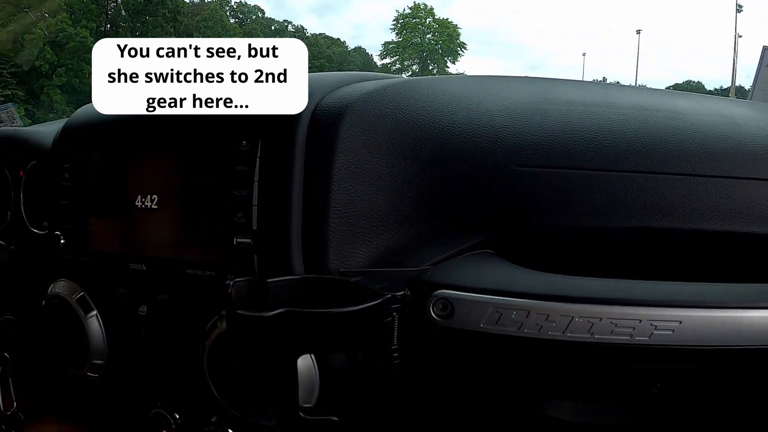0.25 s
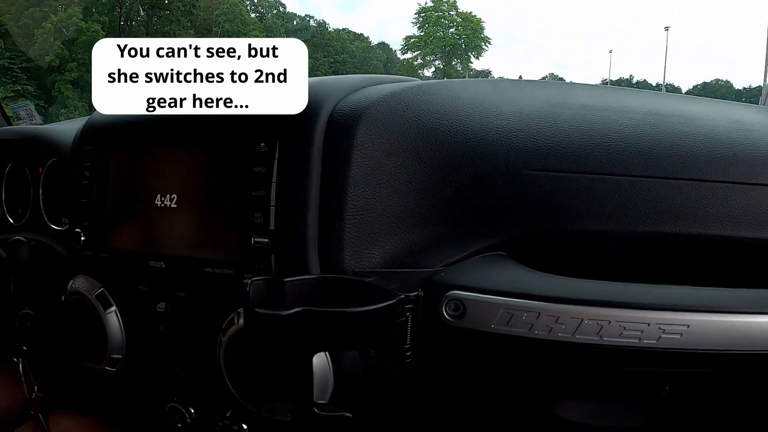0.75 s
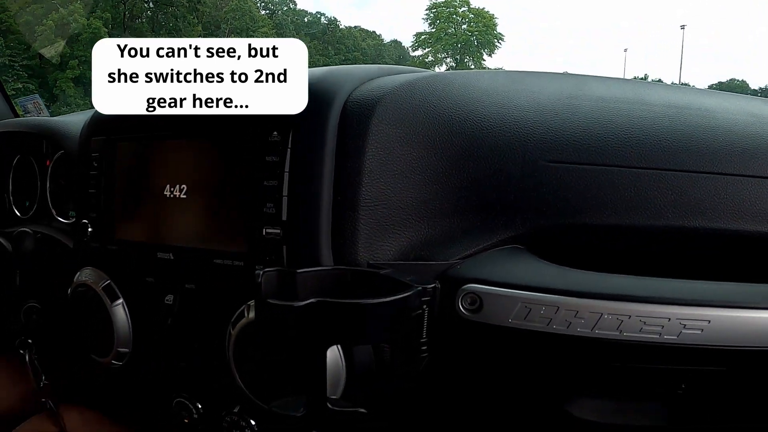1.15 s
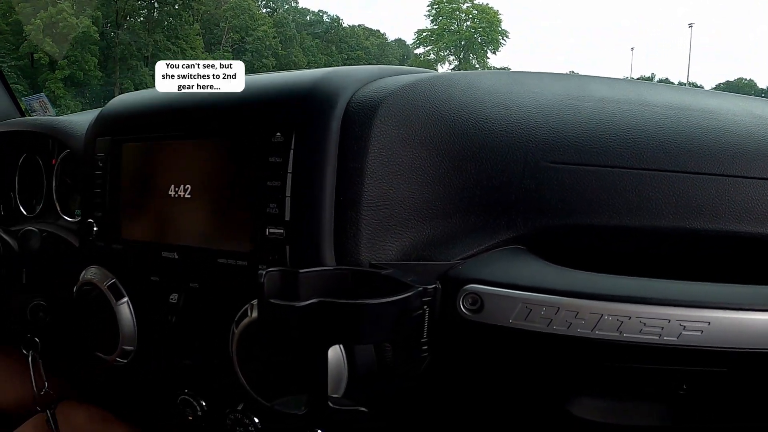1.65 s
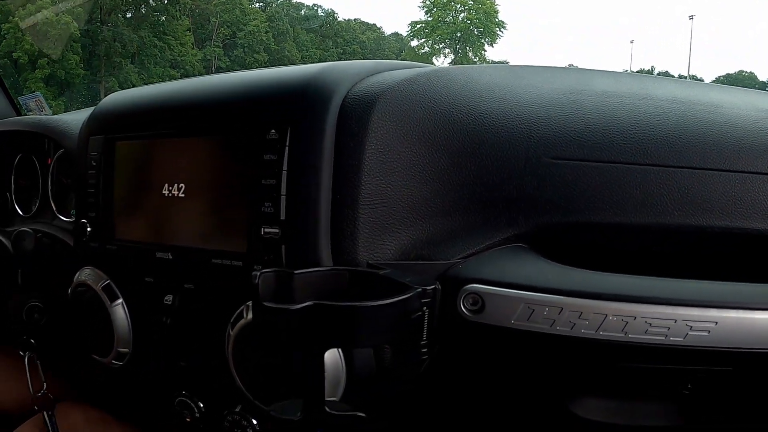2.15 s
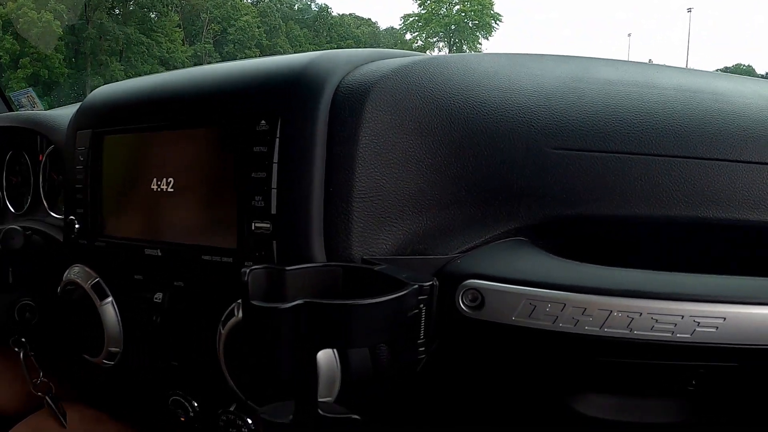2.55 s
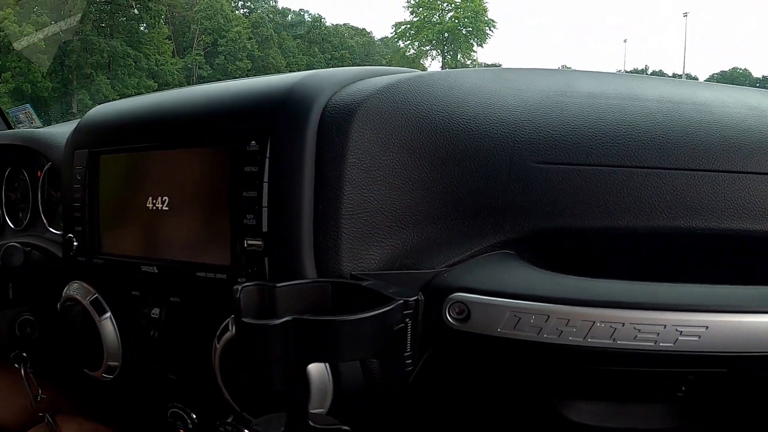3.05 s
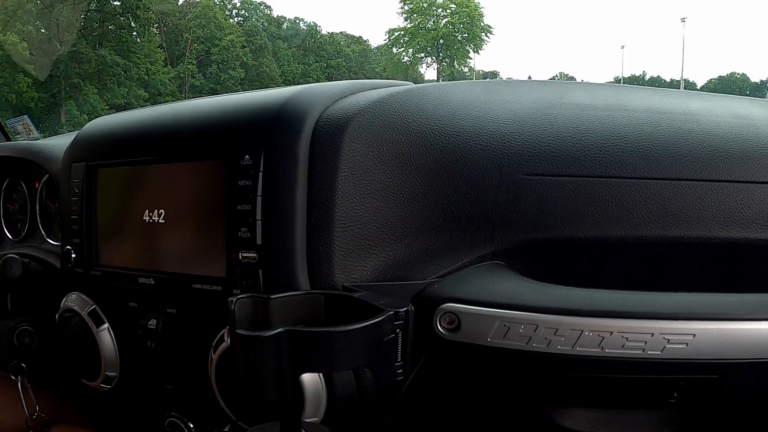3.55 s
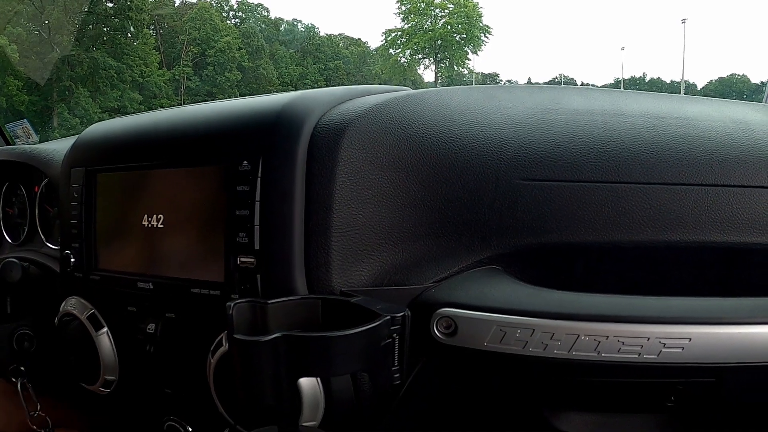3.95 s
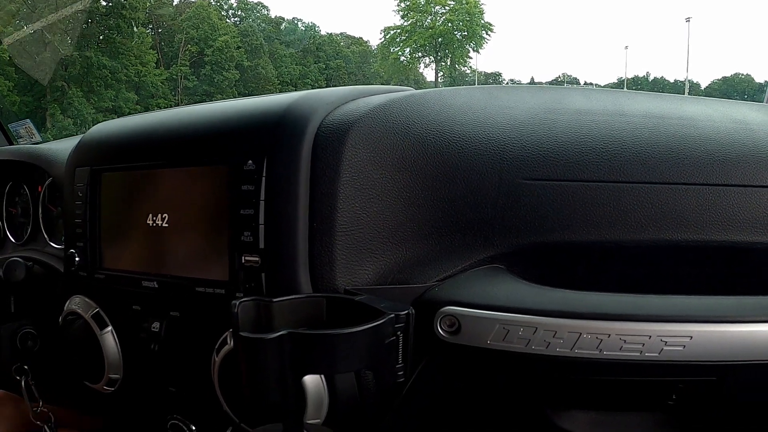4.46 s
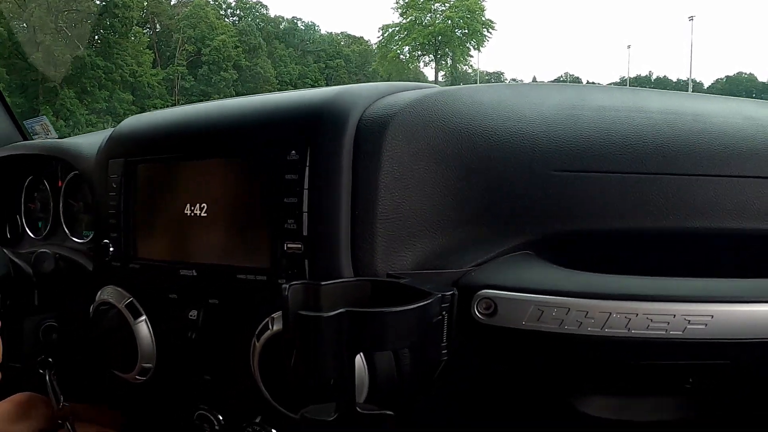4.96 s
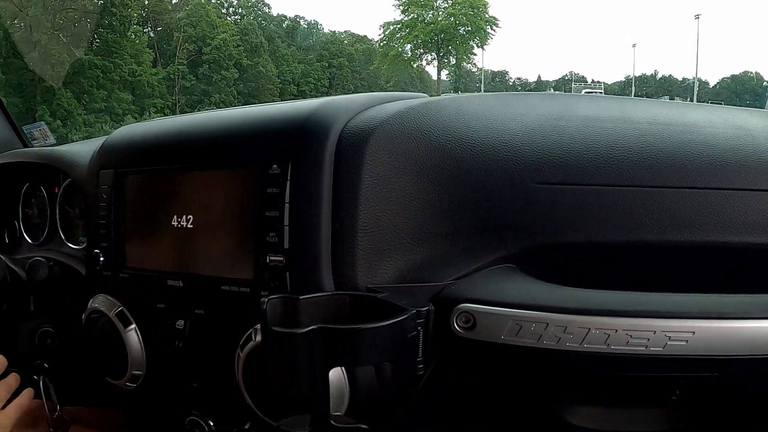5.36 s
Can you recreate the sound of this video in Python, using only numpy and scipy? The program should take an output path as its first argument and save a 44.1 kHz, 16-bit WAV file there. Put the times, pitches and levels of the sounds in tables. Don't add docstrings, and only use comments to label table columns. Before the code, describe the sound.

Inside a slow-moving car, a deep engine boom climbs, dips briefly for a gear change, then returns lower, rougher and shuddering.

```python
import sys
import numpy as np
from scipy import signal
from scipy.io import wavfile
from scipy.ndimage import uniform_filter1d

SR = 44100
rng = np.random.default_rng(int(sys.argv[2]) if len(sys.argv) > 2 else 0)


def decibels_to_gain(level_db):
    exponent = np.asarray(level_db, float) / 20
    return 10 ** exponent


def bounce(signal):
    frames = np.transpose(np.atleast_2d(signal))
    limited = np.clip(frames, -1, 1)
    pcm = np.round(limited * 32767).astype(np.int16)
    wavfile.write(sys.argv[1], SR, pcm)


N = 247071


def evened(x):
    return x / np.sqrt(np.mean(x ** 2) + 1e-20)


def read(points, hz):
    f, value = np.transpose(points)
    return np.interp(np.log(hz + 1), np.log(f + 1), value)


def columns(rows, t):
    s, *rest = np.transpose(rows)
    return [np.interp(t, s, c) for c in rest]


def swells(at, half, heights, power):
    t = np.arange(0, N + 128, 128) / SR
    shapes = np.exp(-abs((t - at[:, None]) / half[:, None]) ** power)
    return np.interp(np.arange(N) / SR, t, np.dot(heights, shapes))


def wander(rate_hz):
    t = np.arange(0, N, 256) / SR
    slow = 0
    for f in np.geomspace(rate_hz / 20, rate_hz, 16):
        slow = slow + np.sin(2 * np.pi * (f * t + rng.random())) / np.sqrt(f)
    return np.interp(np.arange(N) / SR, t, evened(slow))


def resonate(x, hz, width):
    turn = np.exp(2j * np.pi * np.cumsum(hz * np.ones(x.shape[-1])) / SR)
    r = np.exp(-np.pi * width / SR)
    low = signal.lfilter([1 - r], [1, -r], x / turn)
    low = signal.lfilter([1 - r], [1, -r], low)
    return 2 * (turn * low).real


def grit(size, own_share):
    common, left, right = rng.standard_normal((3, size))
    return common + own_share * np.array([left, right])


def puff(t, rise, t60):
    attack = np.sin(np.pi / 2 * np.minimum(t / rise, 1)) ** 2
    return attack * decibels_to_gain(-60 * np.maximum(t - rise, 0) / t60)


def add(mix, s, sound):
    part = mix[:, round(s * SR):][:, :sound.shape[1]]
    part += sound[:, :part.shape[1]]


# (time [s], half the firing rate [Hz])
ENGINE_SPEED = [(0.0, 24.65), (0.45, 25.31), (1.5, 26.5), (1.78, 26.25), (1.94, 25.8), (2.19, 24.13),
                (2.44, 24.3), (2.6, 23.4), (3.06, 20.15), (3.42, 19.3), (3.7, 18.0), (4.04, 17.2),
                (4.42, 17.01), (4.68, 15.78), (4.82, 15.95), (5.1, 16.97), (5.3, 17.53), (5.6, 17.62)]
# (time [s], level from full pull [dB])
ENGINE_LOAD = [(0.0, 2.5), (0.1, -4.5), (0.3, .6), (1.55, -.6), (1.68, -3), (1.78, -11), (1.94, -17),
               (2.21, -10), (2.3, .8), (2.6, -.3), (2.9, -2.5), (3.42, -6), (3.49, -21), (3.63, -19),
               (3.74, -12), (4.6, -8), (5.0, -6), (5.6, -11)]
# (time [s], half length [s], firing tone [dB], even multiples [dB], odd multiples [dB])
DRIVELINE_SURGES = [(1.44, 0.4, 0.1, -2.5, 4), (1.774, 0.096, -2, -2, 9), (2.075, 0.1, 7.5, -6, -3),
                    (2.418, 0.16, 1, -6, 2), (2.577, .06, 1.1, -0.3, -9), (2.763, 0.16, -1.8, -10, 3.5),
                    (2.904, 0.017, 2.5, 7.5, -4), (3.032, 0.1, -4.5, -4.5, 4), (3.135, 0.12, 1, 7.5, -5),
                    (3.27, 0.023, -3.5, -7.5, 2.7), (3.344, 0.043, 6.5, 5, -20),
                    (3.417, 0.03, -2.5, -0.5, 14), (3.593, 0.088, -6, 0.5, 10),
                    (3.708, 0.06, 4.5, 2.5, 0.5), (4.037, 0.081, 10.5, -3.2, 6),
                    (4.194, 0.064, 6, -0.5, -1), (4.37, 0.046, -1, -0.5, -4.5), (4.506, 0.044, -1, -2, 0),
                    (4.704, 0.12, -2, 3, -12), (4.827, 0.045, 7, -3, -3.5), (5.028, 0.08, 7, -6.2, -7.5),
                    (5.196, 0.13, -5.5, -7.5, 3.5), (5.418, .05, 8.5, -5, .6),
                    (5.506, 0.048, -16, 4.5, -13)]
UPPER_LEVELS = [-24, -19, -19.5, -19, -30.5, -19.5, -22.5, -23, -23.5]
# (frequency [Hz], level [dB])
CABIN_RESPONSE = [(80, -10.5), (100, -18), (110, -7), (122, -1), (139, -6.5), (150, -15.5), (157, -28.5),
                  (166, -42), (205, -45), (260, -41.5), (330, -57)]
# (frequency [Hz], level [dB])
FLOOR_PAN_RESPONSE = [(62, 1.5), (70, -3.5), (81, -2.8), (92, 0.5), (99, -6), (106, -2)]


def engine():
    firing_db, octave_db, third_db = -17, -26, -22.5
    upper_follow = 1.26
    boom_hz, third_db_per_hz = 17.5, -3.1
    bite_s, banks_even_db = 2.3, -8
    lag = 0.64

    t = np.arange(N) / SR
    load_db = columns(ENGINE_LOAD, t)[0]
    at, half, *heights = np.transpose(DRIVELINE_SURGES)
    surge_db, even_db, odd_db = (swells(at, half, h, power=1.7) for h in heights)
    odd_db = odd_db + banks_even_db / (1 + np.exp((bite_s - t) / 0.045))

    hz = uniform_filter1d(columns(ENGINE_SPEED, t)[0], size=4000)
    turns = np.cumsum(hz * (1 + 0.003 * wander(6))) / SR + 0.29

    db = firing_db + load_db + surge_db + 0.23 * wander(15)
    out = decibels_to_gain(db) * np.cos(4 * np.pi * turns)

    db = octave_db + 0.59 * load_db + 0.9 * even_db + read(FLOOR_PAN_RESPONSE, 4 * hz)
    out += decibels_to_gain(db) * np.cos(2 * np.pi * (4 * turns + lag))

    db = third_db + 1.1 * load_db + 1.1 * odd_db + third_db_per_hz * np.maximum(hz - boom_hz, 0)
    out += decibels_to_gain(db) * np.cos(2 * np.pi * (3 * turns + lag))

    for order, level_db in enumerate(UPPER_LEVELS, 5):
        db = level_db + upper_follow * load_db + (odd_db if order % 2 else even_db)
        db += read(CABIN_RESPONSE, order * hz)
        db += 0.8 * wander(10)
        out += decibels_to_gain(db) * np.cos(2 * np.pi * (order * turns + lag))
    return np.sqrt(2) * out


# (time [s], level [dB])
JUDDER_SWELL = [
    (2.6, -67.5),
    (2.68, -25.5),
    (2.76, -21.5),
    (2.82, -24),
    (2.88, -57),
]


def judder():
    t = np.arange(N) / SR
    return np.sqrt(2) * decibels_to_gain(columns(JUDDER_SWELL, t)[0]) * np.cos(2 * np.pi * 119.4 * t)


# (time [s], level [dB], half length [s])
BUMPS = [(0.361, -31, .06), (0.701, -31, 0.1), (1.006, -33.5, .08), (1.389, -35.5, 0.053),
         (1.62, -33.5, 0.12), (1.834, -14.5, 0.036), (2.081, -17.5, 0.081), (2.286, -29.5, 0.13),
         (2.681, -30, 0.089), (3.497, -35, 0.12), (3.898, -30, 0.11), (4.188, -23.5, 0.037),
         (4.517, -21, 0.017), (4.666, -21, 0.039), (4.9, -30, .15), (5.168, -30.5, .05),
         (5.268, -26, 0.013), (5.6, -19.5, 0.2)]
# (time [s], level [dB], half length [s])
SHAKES = [(0.02, -30, .15), (.48, -34, .08), (.95, -32, .1), (1.32, -31.5, .08), (1.62, -32.5, .12),
          (2.03, -29.5, .04), (2.2, -28, .05), (2.45, -36, .15), (2.81, -26, .1), (3.15, -30, .18),
          (3.51, -23.5, .14), (3.9, -26.5, .12), (4.12, -31.5, .05), (4.47, -29, .1), (4.66, -28, .1),
          (4.85, -35, .09), (5.24, -26, .04), (5.36, -29, .1)]
# (frequency [Hz], width [Hz], level [dB])
SUSPENSION_MODES = [(16.28, 2.9, -5.5), (23.86, 6.5, 0)]
# (frequency [Hz], width [Hz], level [dB])
PANEL_MODES = [(45.27, 4.6, 5.5), (58.06, 8.2, -1), (68.87, 3, -7), (86, 34, -13), (127.74, 21, -3.5)]
REST_LEVELS = (-53.5, -54)


def body():
    out = np.zeros(N)
    shaken = zip((BUMPS, SHAKES), REST_LEVELS, (SUSPENSION_MODES, PANEL_MODES))
    for rows, rest_db, modes in shaken:
        at, db, half = np.transpose(rows)
        shake = rng.standard_normal(N)
        ring = sum(decibels_to_gain(d) * evened(resonate(shake, hz, width)) for hz, width, d in modes)
        swing = uniform_filter1d(uniform_filter1d(ring ** 2, size=5000), size=5000)
        steady = ring / np.sqrt(abs(swing) + 0.23)
        out += (decibels_to_gain(rest_db) + swells(at, half, decibels_to_gain(db), power=1)) * steady
    return out


# (frequency [Hz], width [Hz], level [dB])
FLOOR_PAN_MODES = [(39, 21, 3.5), (61.75, 7.9, 1), (79.6, 37, -9.5), (109.5, 27, -7), (142.4, 19, -11.5)]


def rumble():
    shake = rng.standard_normal(N)
    out = np.zeros(N)
    for hz, width, db in FLOOR_PAN_MODES:
        ring = resonate(resonate(shake, hz, width), hz, 2 * width)
        out += decibels_to_gain(db) * evened(ring)
    return decibels_to_gain(-39.5) * out


# (time [s], squeak pitch [Hz], squeak level [dB], scrape level [dB])
HAND_RUB = [
    (5.35, 1330, -69, -59.5),
    (5.38, 1820, -59, -55),
    (5.4, 1770, -57.5, -53.5),
    (5.414, 1460, -53, -46.5),
    (5.45, 1330, -63.5, -60),
]
# (frequency [Hz], width [Hz], level [dB])
PLASTIC_MODES = [(3470, 560, -4), (4450, 4400, 5.5), (5760, 990, 0), (6640, 910, -3), (7740, 3100, -3),
                 (10760, 6300, -12.5)]


def squeak():
    t = np.arange(HAND_RUB[0][0], HAND_RUB[-1][0], 1 / SR)
    hz, tone_db, scrape_db = columns(HAND_RUB, t)
    slips = grit(len(t), 0.8)
    tone = evened(resonate(slips, hz, 380))
    tone = tone + decibels_to_gain(-6) * evened(resonate(slips, 2 * hz, 910))
    scrape = evened(sum(decibels_to_gain(db) * evened(resonate(slips, f, width)) for f, width, db in PLASTIC_MODES))
    rub = decibels_to_gain(tone_db + 7.5) * tone + decibels_to_gain(scrape_db) * scrape
    out = np.zeros((2, N))
    add(out, t[0], rub * signal.windows.tukey(len(t), 0.15))
    return out


# (time [s], level [dB], decay t60 [s])
KEY_CLICKS = [(.045, -63.5, 0.071), (.264, -65.5, 0.045), (.419, -57, 0.024), (.44, -65, 0.013),
              (.462, -71, 0.089), (1.14, -64.5, 0.021), (1.17, -77, 0.055), (1.26, -72, 0.044),
              (1.97, -71, .04), (3.995, -59.5, 0.016), (4.215, -68, 0.021), (5.312, -71, 0.028),
              (5.44, -67.5, 0.39)]
# (time [s], level [dB], decay t60 [s])
CLOTH_BRUSHES = [(.08, -72, 0.16), (.135, -69, 0.1), (.355, -70, 0.11), (.43, -66, 0.092),
                 (.58, -70.5, 0.26), (.62, -69.5, 0.21), (0.656, -68.5, .05), (2.22, -80.5, .5),
                 (5.2, -64, 0.17), (5.478, -68.5, .08)]
# (time [s], level [dB], decay t60 [s])
GEAR_LINKAGE = [
    (2.209, -62.5, 0.86),
    (2.4, -62, .1),
]
# (time [s], level [dB], decay t60 [s])
LOOSE_LATCH = [
    (4.312, -51.5, .03),
    (4.355, -44.5, 0.018),
    (4.466, -50.5, 0.042),
]
# (time [s], level [dB], decay t60 [s])
PEDAL_BOX = [
    (1.859, -50.5, 0.19),
    (5.07, -49, 0.29),
    (5.17, -53, .2),
    (5.249, -45.5, 0.19),
]
# (time [s], level [dB], decay t60 [s])
GEAR_LEVER = [
    (.83, -65.5, 0.035),
    (4.178, -63.5, 0.096),
]
# (centre [Hz], width [Hz], rise as a share of t60 [ratio])
TOUCHED_PARTS = [
    (4800, 5000, 0.043),
    (5200, 6500, 0.19),
    (2300, 1000, 0.032),
    (1220, 370, 0.12),
    (267, 100, 0.18),
    (3120, 1900, .08),
]


def ticks():
    out = np.zeros((2, N))
    t = np.arange(SR // 3) / SR
    touches = (KEY_CLICKS, CLOTH_BRUSHES, GEAR_LINKAGE, LOOSE_LATCH, PEDAL_BOX, GEAR_LEVER)
    for rows, (hz, width, share) in zip(touches, TOUCHED_PARTS):
        for s, db, t60 in rows:
            ring = evened(resonate(grit(len(t), 0.2), hz, width))
            add(out, s, decibels_to_gain(db) * puff(t, share * t60, t60) * ring)
    return out


# (time [s], level [dB], decay t60 [s])
KEY_BLOWS = [
    (5.175, -54.5, 0.065),
    (5.203, -56, 0.025),
    (5.221, -62.5, 0.061),
    (5.237, -59.5, 0.028),
    (5.244, -74.5, 0.056),
    (5.263, -63, 0.03),
]
# (frequency [Hz], width [Hz], level [dB])
DASH_PLASTIC = [(3120, 720, 1.5), (4470, 390, -7.5), (5150, 520, -8), (6330, 700, -16), (8640, 1400, -9),
                (4500, 6000, 5)]


def rattle():
    out = np.zeros((2, N))
    t = np.arange(SR // 3 // 4) / SR
    for s, db, t60 in KEY_BLOWS:
        blow = grit(len(t), 1.0)
        spot = rng.uniform(0.87, 0.97)
        ring = sum(decibels_to_gain(d) * evened(resonate(blow, spot * hz, width)) for hz, width, d in DASH_PLASTIC)
        add(out, s, decibels_to_gain(db) * puff(t, 0.007, t60) * evened(ring))
    return out


# (time [s], level [dB], start pitch [Hz], end pitch [Hz], echo t60 [s])
WHISTLES = [
    (1.702, -64.5, 5930, 4170, 0.044),
    (1.759, -66, 4980, 5900, 0.063),
    (3.061, -71, 4960, 7640, 0.53),
    (3.069, -67, 6400, 7960, 0.47),
]


def chips():
    out = np.zeros((2, N))
    t = np.arange(SR // 3) / SR
    for s, db, from_hz, to_hz, t60 in WHISTLES:
        hz = np.linspace(from_hz, to_hz, round(0.011 * SR))
        sweep = np.sin(2 * np.pi * np.cumsum(hz) / SR) * signal.windows.tukey(len(hz), 0.5)
        echo = 0.056 * grit(len(t), 0.56) * puff(t, 0.006, t60)
        echo[:, 0] = 1
        add(out, s, decibels_to_gain(db) * signal.fftconvolve(sweep[None], echo, axes=1))
    return out


# (time [s], level [dB])
COARSENESS = [(0.0, 0.5), (0.5, 1.8), (1.0, 0.2), (1.7, 0.7), (2.28, 2), (2.5, -0.9), (3.05, -2.5),
              (3.6, -3), (3.9, -1.1), (4.4, -0.2), (4.9, -.6), (5.15, 0.7), (5.6, 0.4)]
# (frequency [Hz], level [dB per Hz])
TYRE_ROAR = [(100, -35.5), (170, 1.5), (225, 3), (279, -11.5), (302, -4.5), (365, -15.5), (409, -7),
             (486, -9.5), (608, -15), (950, -18.5), (1240, -49), (2090, -120)]
# (frequency [Hz], level [dB per Hz])
DASH_HISS = [(500, -36), (850, -23), (1050, 2), (1320, 2), (1560, -3), (1880, -3.5), (2280, -9),
             (2550, -9.5), (3200, -23), (4160, -43), (7040, -120)]
# (frequency [Hz], level [dB per Hz])
HIGH_RUSTLE = [(1760, -24), (3000, -1), (3520, -4), (3870, -5), (7190, -12.5), (9390, -20), (10200, -35),
               (14800, -27)]
# (level [dB], share of the coarseness [ratio], drift [dB per s], flicker [dB])
LAYERS = [
    (-53, 0.83, 0.68, 0.98),
    (-61, 0.82, 0.2956, 0.66),
    (-71.5, 1.1, -0.02, 0.54),
]
# (frequency [Hz], likeness [ratio])
EAR_LIKENESS = [(60, 0.59), (180, 0.99), (540, 0.85), (1600, 0.67), (4800, 0.19), (14300, 0.13)]
# (frequency [Hz], level [dB])
LEFT_LOUDER = [(60, 1.4), (180, 0.5), (540, 0.46), (1600, 1.3), (4800, 2.4), (14300, 2.0)]
# (frequency [Hz], phase [radians])
LEFT_LEADS = [(100, -0.019), (1000, -0.32), (2150, 0.14), (2840, -0.54), (4740, 0.23), (7580, -0.053),
              (10800, 0)]


def road():
    frames = N // 256 + 5
    hz = np.fft.rfftfreq(1024, 1 / SR)
    t = np.arange(frames) * 256 / SR
    a, b, c, d, patches = rng.standard_normal((frames, 513, 5)).T
    patches = evened(uniform_filter1d(uniform_filter1d(patches, 10, 0), 8, 1))
    flicker = evened(uniform_filter1d(rng.standard_normal(frames), 2))
    coarse_db = columns(COARSENESS, t)[0]
    power = 0
    for shape, (db, share, drift_db, flicker_db) in zip((TYRE_ROAR, DASH_HISS, HIGH_RUSTLE), LAYERS):
        level_db = db + share * coarse_db + drift_db * t + flicker_db * flicker
        colour = decibels_to_gain(read(shape, hz)) ** 2 * (hz > shape[0][0]) * (hz <= shape[-1][0])
        power = power + np.outer(colour / colour.sum(), decibels_to_gain(level_db) ** 2)

    same = np.clip(read(EAR_LIKENESS, hz), -1, 1)[:, None]
    left = a + 1j * b
    right = same * left + np.sqrt(1 - same ** 2) * (c + 1j * d)
    z = np.array([left, right]) * np.sqrt(power) * decibels_to_gain(1.4 * patches)
    tilt = decibels_to_gain(read(LEFT_LOUDER, hz) / 2) * np.exp(0.5j * read(LEFT_LEADS, hz))
    z *= np.array([tilt, 1 / tilt])[:, :, None]
    return decibels_to_gain(0.86) * signal.istft(z, nperseg=1024, noverlap=768)[1][:, :N]


# (time [s], level [dB])
FAR_TRILL = [
    (3.95, -110),
    (4.05, -84),
    (4.3, -84),
    (4.48, -84),
    (4.6, -110),
]


def whines():
    t = np.arange(N) / SR
    blower = decibels_to_gain(-70.5 + 1.3 * wander(6)) * evened(resonate(grit(N, 0.29), 513, 33))
    throb = np.maximum(np.sin(2 * np.pi * 25 * t + 1.1 * wander(6.6)), 0)
    trill = throb * evened(resonate(grit(N, 0.6), 7450, 150))
    return blower + decibels_to_gain(columns(FAR_TRILL, t)[0]) * trill


def scene():
    bass = (engine() + judder() + body() + rumble()) * decibels_to_gain(np.array([[0.5], [-0.5]]))
    near = (squeak() + ticks() + rattle() + chips()) * decibels_to_gain(np.array([[1.3], [-1.3]]))
    housing = signal.butter(3, 11000, fs=SR, output="sos")
    return bass + signal.sosfilt(housing, near) + road() + whines()


def low_pass(x):
    return signal.sosfilt(signal.butter(12, 14940, fs=SR, output="sos"), x)


def record(dry):
    return low_pass(dry)


dry = scene()
out = record(dry)
bounce(out)
```